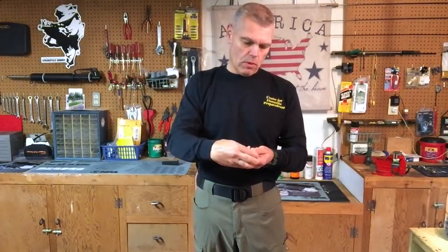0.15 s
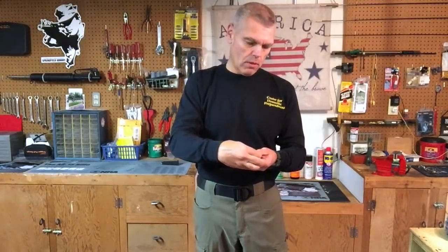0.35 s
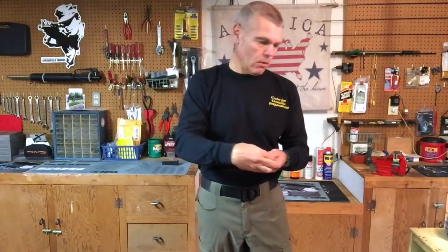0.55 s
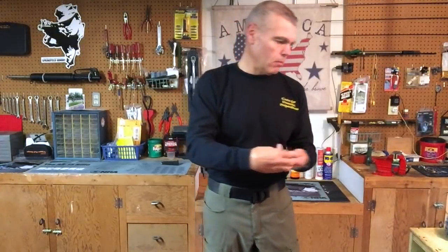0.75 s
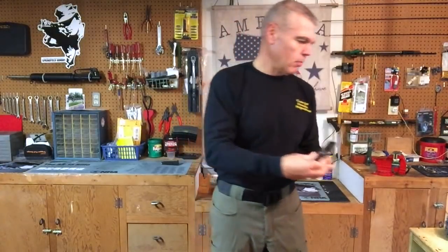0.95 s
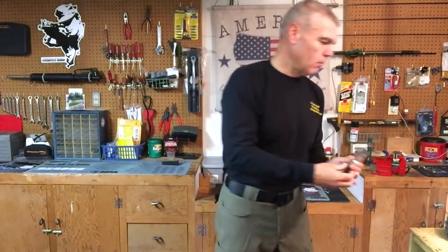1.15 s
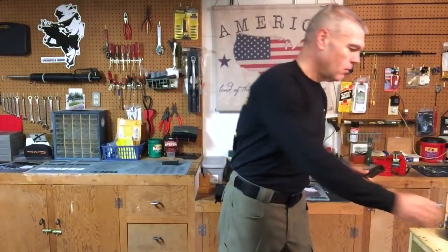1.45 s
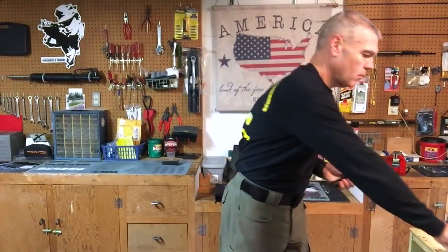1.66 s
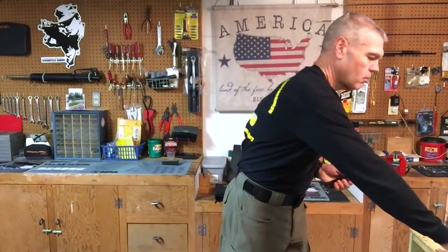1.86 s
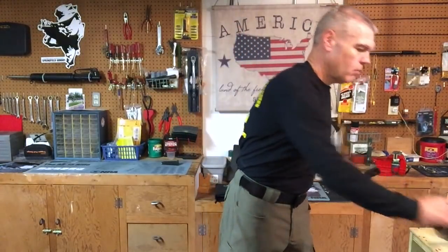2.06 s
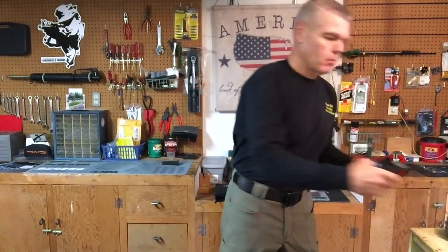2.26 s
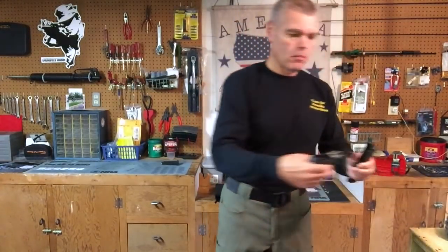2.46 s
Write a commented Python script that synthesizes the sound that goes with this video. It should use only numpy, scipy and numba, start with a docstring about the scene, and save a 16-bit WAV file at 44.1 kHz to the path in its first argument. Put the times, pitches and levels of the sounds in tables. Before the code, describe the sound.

A spring snaps home and rings shortly, clothes rustle, then metal parts knock and drag on wood, scrape and click together; low hum and faint ticking behind, small room, automatic level ducking after loud hits.

```python
"""A motor and the mains hum in a quiet workshop and something ticks steadily; then a spring snaps home and buzzes on.
Clothes rustle, and metal parts are laid on and lifted off a wooden bench, slid and clicked together.
Hum is a sum of sines, struck parts are decaying modes, and friction and chatter are shaped noise.
A loose microphone contact crackles, and the recorder's gain control ducks after loud hits."""
import sys
import numpy as np
from scipy import signal
from scipy.fft import rfft, irfft, next_fast_len
from scipy.io import wavfile
from scipy.ndimage import uniform_filter1d, map_coordinates
from numba import njit

SR = 44100
rng = np.random.default_rng(int(sys.argv[2]) if len(sys.argv) > 2 else 0)


def level_to_linear(level):
    """Convert decibel levels to linear amplitude factors, elementwise."""
    exponent = np.asarray(level, float) / 20
    return 10 ** exponent


def wav_record(signal):
    """Record a signal, one row per channel, as 16-bit PCM in the file named by sys.argv[1]."""
    frames = np.transpose(np.atleast_2d(signal))
    bounded = np.clip(frames, -1, 1)
    # unit amplitude maps onto the largest positive 16-bit level
    quanta = np.round(bounded * 32767).astype(np.int16)
    wavfile.write(sys.argv[1], SR, quanta)


N = 114660  # length in samples


def unit(x):
    """Normalisation by energy: scales the signal to rms 1."""
    return x / np.sqrt(np.mean(x ** 2) + 1e-20)


def coloured(x, points):
    """Linear filtering: multiplies the spectrum by a gain curve through (Hz, dB) points, without phase shift."""
    point_hz, point_db = np.transpose(points)
    size = next_fast_len(len(x) + 8192)
    hz = np.fft.rfftfreq(size, 1 / SR)
    gain_db = np.interp(np.log(hz + 1), np.log(point_hz + 1), point_db)
    return irfft(rfft(x, size) * level_to_linear(gain_db), size)[:len(x)]


def wobble(count):
    """Slow random modulation: a smooth curve through count random knots a second."""
    knots = rng.standard_normal(int(N * count / SR) + 4)
    return map_coordinates(knots, [np.arange(N) * count / SR])


def level(rows):
    """Amplitude envelope: gain linear in dB between (s, dB) rows, -120 dB outside them."""
    s, db = np.transpose(rows)
    return level_to_linear(np.interp(np.arange(N) / SR, s, db, left=-120, right=-120))


def ring(modes, focus_hz, spread, rise_ms=0.17):
    """Modal synthesis: one blow excites damped modes near focus_hz, 6 dB less one spread (octaves) away."""
    roughness = .019  # phase wander in radians per sample at 100 Hz
    t = np.arange(SR // 4) / SR
    hz, db, t60 = np.transpose(modes)[:, :, None]
    uneven_db = 2 * rng.standard_normal(hz.shape)
    db = db + uneven_db - 6 * (np.log2(hz / focus_hz) / spread) ** 2
    # wandering phases make the ring rough
    wander = roughness * np.sqrt(hz / 100) * np.cumsum(rng.standard_normal((len(hz), len(t))), axis=1)
    sign = (-1) ** np.arange(len(hz))[:, None]
    waves = sign * level_to_linear(db - 60 * t / t60) * np.sin(2 * np.pi * hz * t + wander)
    rise = 1 - np.exp(-1000 * t / rise_ms)
    return np.sum(waves, axis=0) * rise


def add(track, s, db, sound):
    """Superposition: adds the sound to the track at s seconds, its peak scaled to db."""
    part = track[round(s * SR):][:len(sound)]
    part += level_to_linear(db) * sound[:len(part)] / np.abs(sound).max()


def rubbing(colour):
    """Friction as a random train of tiny impulses: dense uneven grains, coloured, rms 1."""
    grains_per_s, spread_db = 9000, 2.2
    fires = rng.random(N) < grains_per_s / SR
    grains = fires * rng.standard_normal(N) * level_to_linear(spread_db * wobble(300))
    return unit(coloured(grains, colour))


def room_tone():
    """Stationary broadband noise: the room's air noise is Gaussian noise with a falling spectrum."""
    # Spectrum of the air noise. Each row: frequency in Hz, relative level in dB per Hz.
    air_colour = [(12, -38), (20, 0), (32, -17.5), (90, -18), (165, -12), (230, -17.5), (316, -22),
                  (450, -21.5), (670, -27.5), (1880, -34), (3000, -35), (15600, -42)]
    return level_to_linear(-41.5) * unit(coloured(rng.standard_normal(N), air_colour))


def hum():
    """Beating: close pairs of motor and mains tones drift in and out of step, beside single steady tones."""
    # Beating pairs. Each row: frequency in Hz, level in dB, partner's frequency in Hz, partner's level in dB,
    # time in seconds at which both are in step.
    beats = [(57.05, -28, 58.7, -41, 2.25), (119.88, -35, 114.3, -42.5, 1.52)]
    # Single tones. Each row: frequency in Hz, level in dB.
    tones = [(239.8, -53.5), (411.9, -45.5), (529.7, -52), (597, -58), (823, -60), (1918, -60)]
    waver_db = .6  # the levels above waver by this much (rms of the random knots)
    t = np.arange(N) / SR
    out = np.zeros(N)
    for hz, db, other_hz, other_db, s in beats:
        turn = 2 * np.pi * (t - s)
        pair = level_to_linear(db) * np.cos(hz * turn) + level_to_linear(other_db) * np.cos(other_hz * turn)
        out += level_to_linear(waver_db * wobble(4.61)) * pair
    for hz, db in tones:
        out += level_to_linear(db + waver_db * wobble(8.11)) * np.sin(2 * np.pi * (hz * t + rng.random()))
    return out


def ticking():
    """Periodic excitation of one resonance: a faint tick at equal intervals."""
    first_s, every_s = .2262, .2712
    hz, t60_s, peak_db = 1590, 0.0038, -33.5
    out = np.zeros(N)
    for s in np.arange(first_s, N / SR, every_s):
        add(out, s, peak_db, ring([(hz, 0, t60_s)], hz, 1))
    return out


def rustle():
    """Amplitude-modulated friction noise: moving clothes swell and flutter."""
    # Swells of the rustle. Each row: time in seconds, level in dB.
    swells = [(0, -83), (.9, -47.5), (1.2, -51), (1.26, -44.5), (1.33, -49), (1.58, -45), (1.68, -45.5),
              (1.8, -41), (1.9, -45), (2.0, -41.5), (2.07, -46.5), (2.3, -49.5), (2.55, -49), (2.6, -44.5)]
    # Spectrum of the cloth. Each row: frequency in Hz, relative level in dB per Hz.
    cloth_colour = [(290, -56), (500, -12), (522, -3.5), (611, -13.5), (666, -8), (769, -8), (9110, -16),
                    (15500, -29)]
    flutter = level_to_linear(1.2 * wobble(count=25))
    return level(swells) * flutter * rubbing(cloth_colour)


def slide():
    """Impact and friction: steel parts click in their damped modes and scrape along in strokes."""
    # Small metal clicks. Each row: time in seconds, peak level in dB, strongest near in Hz, spread in octaves.
    clicks = [(1.833, -27, 5000, 0.4), (1.8772, -27, 5950, 0.42), (1.8788, -25, 4320, 0.25),
              (1.9378, -19.5, 5900, 0.65), (2.0047, -25.5, 2700, 0.38), (2.0096, -21, 4300, 0.91),
              (2.0116, -32, 2700, .3), (2.021, -33, 2700, 0.26), (2.2154, -25, 2150, 0.77),
              (2.2801, -9, 2750, 1.34), (2.2915, -20, 2800, 0.77), (2.416, -39, 1850, 0.61),
              (2.595, -36, 3460, 0.65)]
    # Modes of the steel. Each row: frequency in Hz, relative level in dB, 60 dB decay time in seconds.
    steel_modes = [(1800, -6, .012), (2150, 0, .018), (2760, 1, .03), (3000, -2, .02), (3300, -3, .03),
                   (3750, -6, .015), (4300, -5, .012), (5300, -13, .008), (6500, -8, .006),
                   (9300, -2, .008)]
    # Sliding strokes, one list each. Each row: time in seconds, level in dB.
    strokes = [
        [(2.1, -52), (2.126, -33.5), (2.21, -35.5), (2.256, -61), (2.26, -57)],
        [(2.39, -48), (2.42, -44), (2.466, -38.5), (2.5, -68)],
    ]
    # Spectrum of the strokes. Each row: frequency in Hz, relative level in dB per Hz.
    scrape_colour = [(410, -38), (800, -11), (1300, -7.5), (1800, -3), (2370, 2), (2900, -3.5), (3630, -5),
                     (5500, -7.5), (9500, -11), (15500, -29)]
    out = sum(level(rows) for rows in strokes) * rubbing(scrape_colour)
    for s, db, focus_hz, spread in clicks:
        add(out, s, db, ring(steel_modes, focus_hz, spread))
    return out


def bench():
    """Contact hardness: soft contacts ring the wood's low modes, hard ones all of them; parts also drag."""
    # Knocks, and one soft rustle at .53 s. Each row: time in seconds, peak level in dB, strongest near in Hz,
    # spread in octaves, rise time constant in milliseconds.
    contacts = [(1.76, -24, 1010, 0.88, 1), (1.763, -13, 246, 0.77, 1.7), (1.834, -17.5, 570, .8, 0.66),
                (1.8384, -15, 238, 0.64, 2.1), (1.8692, -9, 484, 1.04, 0.39), (1.9077, 2, 1440, 2.38, .1),
                (1.9098, -4, 1330, 1.7, 0.34), (1.918, -15, 1700, 1.8, 0.74),
                (1.9353, -4.5, 860, 0.45, 1.1), (1.958, -17.5, 490, 1.4, 0.51),
                (2.317, -34.5, 754, 0.31, 0.49), (.53, -31, 1020, 0.98, 5.7), (2.1383, -33, 932, 0.6, .5)]
    # Modes of the bench top. Each row: frequency in Hz, relative level in dB, 60 dB decay time in seconds.
    wood_modes = [(229.5, -1, 0.075), (410, -4.5, 0.044), (497, 0, 0.055), (790, 0.5, 0.032),
                  (1190, 2.5, 0.027), (1175, -9, 0.016), (1641, -2, 0.057), (2025, -1.5, 0.03),
                  (2700, -7, 0.014), (3200, -7.5, .012), (3980, 0.5, 0.014), (5000, -5.5, 0.014),
                  (6270, 0, 0.011), (7200, -0.5, 0.009), (10600, -2, 0.0068)]
    # Parts dragged on the wood. Each row: time in seconds, level in dB.
    drags = [(1.74, -51), (1.77, -37), (1.82, -43), (1.88, -48.5), (1.92, -25.5), (1.97, -36.5),
             (2.03, -45)]
    # Spectrum of the dragging. Each row: frequency in Hz, relative level in dB per Hz.
    drag_colour = [(150, -33), (280, 4), (900, -1), (2000, -11.5), (5000, -14), (10000, -23), (15500, -40)]
    out = level(drags) * rubbing(drag_colour)
    for s, db, focus_hz, spread, rise_ms in contacts:
        add(out, s, db, ring(wood_modes, focus_hz, spread, rise_ms))
    return out


def snap():
    """Impact and free decay: milliseconds of bright chatter, then the spring's coils buzz and ring on."""
    # Snaps. Each row: start in seconds, peak level in dB, chatter length in seconds.
    snaps = [(.3911, 4, .0012), (.3929, 4, .001), (.3945, 5, .002), (.4012, 1, .0012)]
    # Spectrum of the chatter. Each row: frequency in Hz, relative level in dB per Hz.
    chatter_colour = [(180, -74), (300, -58), (900, -44), (1700, -18.5), (2940, -2), (4000, -13),
                      (4910, -1), (7000, -10), (8500, -7.5), (9840, -2.5), (11800, -24), (15600, -23)]
    # Spectrum of the coils rattling on. Each row: frequency in Hz, relative level in dB per Hz.
    buzz_colour = [(350, -69), (600, -43), (726, -46), (799, -31), (891, -25), (2020, -17), (3170, 2.5),
                   (3530, -8), (4770, -1), (5180, -2), (8460, 0), (15600, -22)]
    # Modes of the spring. Each row: frequency in Hz, relative level in dB, 60 dB decay time in seconds.
    spring_modes = [(2810, -16, 0.12), (3053, -1, 0.26), (3270, -14, 0.19), (4880, -2, 0.29),
                    (6330, -2, 0.26), (8720, -1, 0.3), (9600, -2.5, 0.29), (11700, -3, 0.15)]
    buzz_db, buzz_t60_s, ring_db = 0.5, 0.22, -8  # levels are relative to the third snap
    out = np.zeros(N)
    t = np.arange(SR // 3) / SR
    for s, db, length in snaps:
        attack = np.minimum(t / 0.00016, 1)
        decay = np.where(t < length, 1, level_to_linear(-60 * (t - length) / 0.017))
        add(out, s, db, attack * decay * coloured(rng.standard_normal(len(t)), chatter_colour))
    s, db, length = snaps[2]  # the buzz and the ring start as this chatter ends
    buzz = level_to_linear(-60 * t / buzz_t60_s) * coloured(rng.standard_normal(len(t)), buzz_colour)
    add(out, s + length, db + buzz_db, buzz)
    add(out, s + length, db + ring_db, ring(spring_modes, 6000, 4, rise_ms=2.4))
    return out


def room(x):
    """Reverberation: convolution with a noise tail in which each frequency dies at its own speed."""
    # Decay of the room. Each row: frequency in Hz, 60 dB decay time in seconds.
    decays = [(200, 0.23), (1000, 0.15), (3000, 0.25), (8000, 0.21), (14000, 0.053)]
    delay_s = .004
    hz, t, z = signal.stft(rng.standard_normal(SR // 2), SR, nperseg=256)
    decay_hz, decay_s = np.transpose(decays)
    t60 = np.interp(hz, decay_hz, decay_s)[:, None]
    tail = signal.istft(z * level_to_linear(-60 * t / t60), SR, nperseg=256)[1]
    delayed = np.pad(x, (round(delay_s * SR), 0))
    return signal.fftconvolve(delayed, tail / np.linalg.norm(tail))[:N]


def scene():
    """Superposition of direct sound, reverberation and background; returns one channel."""
    metal, wood, spring = slide() + ticking(), bench(), snap()
    echo = level_to_linear(-6.5) * room(metal) + level_to_linear(-6.5) * room(wood) + level_to_linear(-15.5) * room(spring)
    background = room_tone() + hum() + rustle()
    return (metal + wood + spring + echo + background)[None]


def crackle():
    """Intermittent contact: the signal steps down for an instant, several times a burst."""
    # Bursts. Each row: start in seconds, length in milliseconds, mean gap between dropouts in milliseconds,
    # nominal dropout width in milliseconds, depth of the step in dB.
    bursts = [(1.7093, .55, .11, .045, -18), (1.7105, 1.7, .45, .045, -18), (1.7898, 2.2, .75, .35, -18),
              (1.7941, .9, .3, .05, -20), (1.7973, 2.9, 1.1, .4, -18), (1.8577, 3.2, .95, .22, -19),
              (2.027, 2, .5, .05, -28)]
    out = np.zeros(N)
    chance = rng.uniform(-1.2, 1, (len(bursts), 8, 2))
    for (s, length, gap, width, db), draws in zip(bursts, chance):
        count = int(length / gap) + 1
        for k, (shift, size) in enumerate(draws[:count]):
            start = round((s + gap * (k + 0.17 * shift) / 1000) * SR)
            samples = max(1, round(width * (1 + .4 * size) * SR / 1000))
            out[start:start + samples] -= level_to_linear(db)
    return out


@njit
def released(need, keep):
    """Peak holding with leakage: follows rises at once and falls off exponentially."""
    out = np.empty_like(need)
    held = 0.
    for i in range(len(need)):
        held = max(need[i], held * keep)
        out[i] = held
    return out


def gain_control(x):
    """Dynamic compression: two stages cut loud sound and let go slowly, one fast and one slow."""
    # Stages. Each row: knee in dB, cut in dB per dB over the knee, release time constant in seconds.
    stages = [(-22, 0.21, 0.18), (-13.5, 0.7146, 0.54)]
    sense_s = .006  # time constant of the power average
    share = 1 / (sense_s * SR)
    power = signal.lfilter([share], [1, share - 1], x ** 2)
    loud_db = 10 * np.log10(power + 1e-12)
    cut_db = np.zeros(len(x))
    for knee_db, slope, release_s in stages:
        need_db = slope * np.maximum(loud_db - knee_db, 0)
        cut_db += released(need_db, np.exp(-1 / (release_s * SR)))
    # the cut is averaged over the latest 200 samples, so it sets in gradually
    return x * level_to_linear(-uniform_filter1d(cut_db, size=200, origin=99))


def roll_off(x):
    """The treble ends steeply here."""
    return signal.sosfilt(signal.butter(12, 15780, fs=SR, output="sos"), x)


def record(dry):
    """Recording chain: gain control, a crackling contact, clipping at full scale and a band limit."""
    top_hz = 15790
    x = np.clip(gain_control(dry[0]) + crackle(), -1, 1)
    x = coloured(x, [(20, 0), (top_hz, 0), (top_hz + 60, -80)])
    mix = np.clip(x, -1, 1)[None]
    return roll_off(mix)


dry = scene()
out = record(dry)
wav_record(out)
```